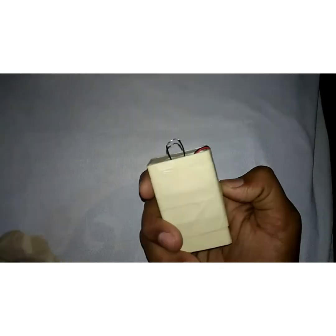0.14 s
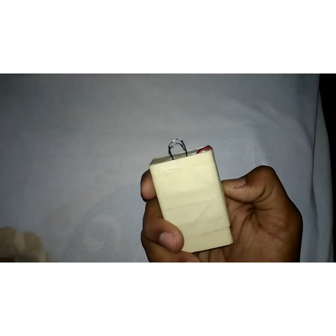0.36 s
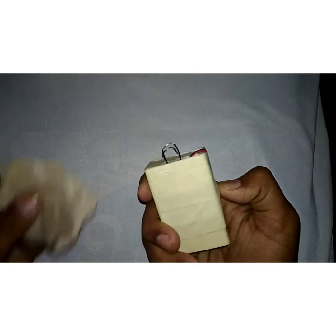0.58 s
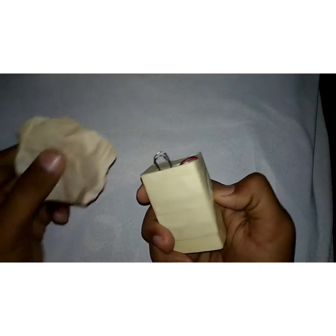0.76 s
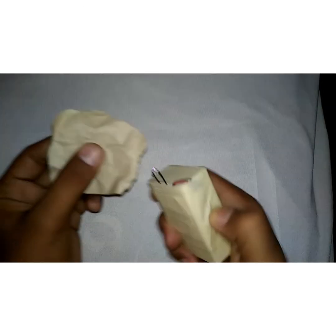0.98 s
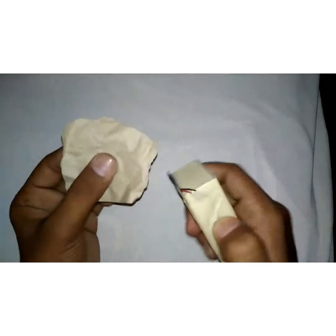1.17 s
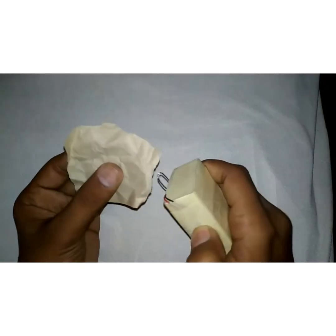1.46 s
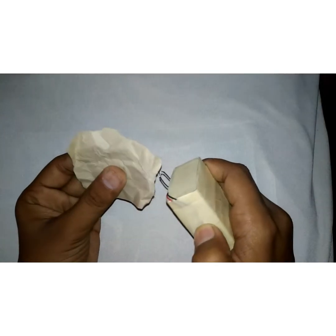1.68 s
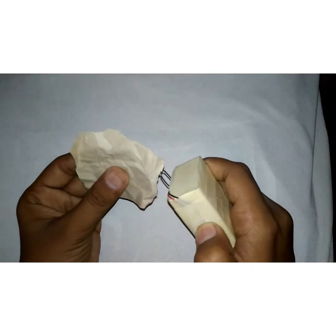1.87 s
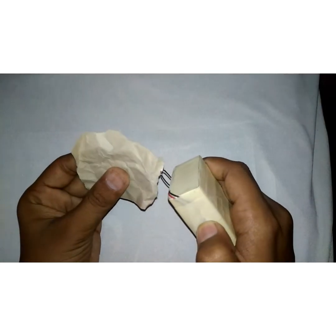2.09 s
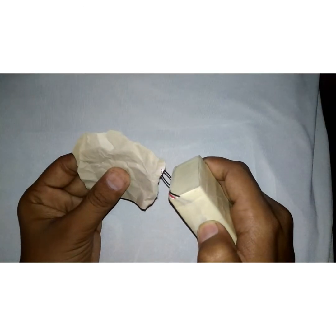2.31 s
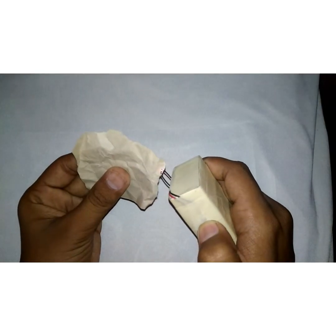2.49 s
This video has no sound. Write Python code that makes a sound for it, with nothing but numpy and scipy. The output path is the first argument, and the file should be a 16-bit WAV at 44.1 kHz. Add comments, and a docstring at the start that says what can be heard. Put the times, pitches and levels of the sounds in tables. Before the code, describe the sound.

An electric arc from a small hand-held device sizzles with a high hiss close to the microphone. It sputters against crumpled paper, squeals briefly and dies away, while fingers rustle faintly in a quiet room.

```python
"""A small hand-held high-voltage device arcs close to a camera while crumpled paper is brought to its electrodes.
Dense, irregular sparks make a high sizzle that sputters near the paper, narrows into brief squeals and dies away.
Fingers rustle faintly on the paper and the box, in a quiet room with a low hum."""
import sys
import numpy as np
from scipy import signal
from scipy.fft import rfft, irfft, next_fast_len
from scipy.io import wavfile
from scipy.ndimage import uniform_filter1d, map_coordinates

SR = 44100
rng = np.random.default_rng(int(sys.argv[2]) if len(sys.argv) > 2 else 0)


def materialize(psi):
    """Save the field psi as 16-bit PCM at rate SR to the path in sys.argv[1].

    A 1-D psi becomes a single channel; in a 2-D psi each row is a channel.
    """
    bounded = np.clip(np.atleast_2d(psi).T, -1, 1)
    quanta = np.round(bounded * 32767).astype(np.int16)
    wavfile.write(sys.argv[1], SR, quanta)


N = 116865

# the arc's main sizzle, 9-12 kHz (s, level dB, left-right dB)
SIZZLE = [(0.04, -68, 21), (0.1, -81, 15), (0.16, -81.0, 15), (0.17, -66.5, 18),
          (0.2, -62, -3), (0.219, -63.5, -18), (0.225, -49.5, -6), (0.24, -42, 3), (0.28, -48, 5), (0.31, -34.5, 0), (0.45, -37, 2),
          (0.6, -38, 4), (0.72, -40, 4.5), (1.065, -40, 4), (1.083, -36.5, 3), (1.13, -34.5, 9), (1.16, -45, 12),
          (1.183, -38, 10), (1.2, -46, 14), (1.25, -47, 5), (1.315, -52, -4),
          (1.382, -42, -17), (1.392, -63, -2), (1.41, -64, -22), (1.425, -43, -9),
          (1.467, -41.5, 5), (1.477, -40, -3), (1.52, -44.5, 3.5), (1.61, -37, 2.5), (1.735, -41, -1.5),
          (1.772, -48, 2), (1.788, -45, -6), (1.81, -45, -11), (1.823, -58, -16),
          (1.842, -57, -4), (1.85, -39, -12), (1.866, -42.5, 5), (1.877, -55, -12),
          (1.925, -41, 0), (2.01, -35.5, 1.5), (2.235, -56.5, -4), (2.263, -34.5, 4), (2.27, -48, 2),
          (2.286, -45, 4), (2.29, -34.5, -0.0), (2.298, -46.5, -1), (2.325, -45, 6), (2.345, -48, -11),
          (2.4, -40.5, 3.5), (2.48, -55.5, 4.5), (2.57, -68, 4), (2.65, -64, 1)]
# level of the lower sizzle, 7-9 kHz (s, dB)
LOWER = [(0.03, -69.5), (0.09, -89), (0.16, -92), (0.18, -63.5), (0.22, -70), (0.24, -40), (0.28, -42.5), (0.42, -44), (0.6, -45), (0.8, -43.5), (1.0, -48),
         (1.1, -48.5), (1.32, -69.5), (1.49, -49), (1.74, -50), (1.77, -65), (1.79, -50), (1.88, -66.5), (1.94, -50.5), (2.0, -46.5),
         (2.24, -60.5), (2.26, -46.5), (2.3, -54), (2.4, -47), (2.42, -58.5), (2.65, -81)]
# level of the fizz above 12 kHz (s, dB)
FIZZ = [(0.0, -94), (0.14, -102), (0.21, -78), (0.23, -56), (0.4, -57.5), (0.45, -60), (0.69, -52.5), (1.19, -54.5),
        (1.22, -61), (1.25, -57.5), (1.47, -55), (1.53, -52), (1.63, -61), (1.67, -51), (1.84, -60.5), (1.93, -52.5),
        (2.07, -47.5), (2.21, -73), (2.26, -62), (2.285, -71), (2.35, -57), (2.375, -59), (2.41, -52), (2.5, -73.5), (2.65, -76.5)]
# level of the dull edge of the hiss, 5-7 kHz (s, dB)
EDGE = [(0.0, -76.5), (0.12, -103), (0.22, -72.5), (0.235, -62), (0.45, -74), (0.85, -70), (0.95, -97), (1.03, -70.5), (1.35, -78),
        (1.52, -70.5), (1.9, -87), (1.95, -62), (2.21, -73), (2.27, -54), (2.35, -62), (2.39, -60.5), (2.65, -91)]
# colours (Hz, dB per Hz)
SIZZLE_COLOUR = [(8500, -44), (8900, -26), (9100, -1), (9450, -6), (9750, 2.5), (9950, -4.5), (10170, 1.5), (10480, -2), (10700, -3), (11000, -9), (11200, -7.5), (11480, -9), (11750, -28.5), (12200, -46.5), (13000, -64.5)]
LOWER_COLOUR = [(6400, -33.5), (7100, -19.5), (7500, -23), (7750, -3), (8000, -4), (8400, 0.5), (8720, -1), (8950, 1), (9400, -31.5)]
FIZZ_COLOUR = [(10500, -28.5), (11900, 0), (12400, -0.5), (13500, -6), (14500, -4), (15600, -9)]
EDGE_COLOUR = [(4000, -46), (5100, -12.5), (5600, -12), (6150, -3.5), (6900, -5), (7500, 4.5), (8500, -53.5)]
ROOM_COLOUR = [(15, -60), (35, -14.5), (114, 1), (164, -11.5), (344, -6.5), (524, -10.5), (627, -13), (1240, -13.5), (2300, -22.5), (3120, -25), (5280, -120)]
# squeals, where the arc locks onto one pitch (start s, length s, pitch Hz, glide Hz, level dB, left-right dB)
SQUEALS = [(0.239, 0.06, 7740, -21, -38, 1), (0.39, 0.079, 9220, -83, -37.5, -3), (0.392, 0.13, 10070, 14, -40, 2.5),
           (0.881, 0.18, 7826, -150, -46.5, -16), (1.068, 0.033, 9820, -400, -34.5, 5), (1.1, 0.0326, 9710, 240, -38, 11), (1.469, 0.028, 9280, 103, -37.5, 1),
           (1.613, 0.0385, 9300, -550, -39.5, -12), (1.848, 0.022, 9580, 43, -40.5, -3), (2.334, 0.052, 9060, 650, -38, 2), (2.377, 0.029, 7670, 2, -42, -1)]
SQUEAL_EDGE_S, SQUEAL_JITTER_HZ, SQUEAL_ROUGH_DB = 0.0072, 88.4, 7.5
FLUTTER_DB, FLUTTER_PER_S = 0.61, 110
SIZZLE_DB, LOWER_DB, FIZZ_DB, EDGE_DB = -1.5, -2, 1.5, 0.5
LOWER_PAN_DB, FIZZ_PAN_DB, EDGE_PAN_DB, SCRAPE_PAN_DB = -14, -1, -2, 9.5
SCATTER_T60_S = 0.06  # reflections from the hands and the cloth
ROOM_PAN = [(40, 3.5), (120, 5.5), (260, 8.5), (1200, 11.5), (2400, 14.5)]  # (Hz, left-right dB)
ROOM_ALIKE = [(40, 1), (120, 0.7), (300, 0.87), (700, 0.19), (1400, 0)]  # (Hz, left-right likeness)
HUM = [(100.5, -84), (124, -85), (200, -88)]  # (Hz, dB)
# soft bumps of the hands on the hollow box (middle s, length s, pitch Hz, level dB)
BUMPS = [(0.258, 0.02, 1265, -69.5), (0.294, 0.022, 358.7, -69), (0.326, 0.02, 620, -71.5), (1.044, 0.071, 352.4, -74), (1.175, 0.088, 124.6, -74.5),
         (1.567, 0.037, 316, -74), (1.631, 0.025, 53.7, -61.5), (1.597, 0.064, 139.7, -70.5), (1.927, 0.031, 111, -69.5), (2.181, 0.018, 614, -65.5)]
TOP_HZ = 15780  # fixed
T = np.arange(N) / SR
# fingers scraping on the box and the paper (start s, length s, centre Hz, level dB)
SCRAPES = [(0.224, 0.055, 3570, -60.5), (0.285, 0.15, 1800, -79), (0.297, 2.3, 3710, -88), (0.685, 0.038, 3060, -78), (0.748, 0.18, 1120, -77.5), (0.858, 0.065, 3460, -71.5),
           (1.098, 0.042, 4800, -69), (1.371, 0.034, 3450, -72.5), (1.422, 0.07, 3270, -78), (1.559, 0.088, 3340, -79), (1.892, 0.13, 3760, -80),
           (2.185, 0.13, 3210, -67.5), (2.36, 0.068, 3250, -71.5), (2.361, 0.13, 900, -74.5), (2.439, 0.053, 4340, -69)]
SCRAPE_WIDTH_OCT = 0.33
BUMP_PAN_DB = 10.5
SCATTER_HOLD_S = .09  # fixed
ROOM_DB = -71.5
MIC_HISS_DB = -83  # fixed
ARC_PATCHY_DB, ROOM_PATCHY_DB = 3, 3
# the arc sputters: brief spurts and gaps (middle s, length s, change dB)
SPUTTERS = [(0.402, 0.002, -3), (0.66, 0.0042, 4.5), (0.767, .003, 6), (0.783, 0.0022, 6.5), (0.952, 0.0014, 8), (1.183, 0.002, 9), (1.208, 0.0044, 0),
            (1.25, 0.0033, 8), (1.27, 0.004, 6.5), (1.326, 0.009, 6), (1.338, 0.0034, -9), (1.467, 0.0055, -9), (1.478, 0.0017, 4.5), (1.483, 0.0062, -3),
            (1.507, 0.0026, 3), (1.577, 0.0034, 5), (1.607, 0.0044, 1.5), (1.732, 0.0047, 4.5), (1.754, 0.01, 4.5), (1.833, 0.0063, 9), (1.859, 0.0029, -11),
            (2.15, .004, -1), (2.202, 0.0045, 6), (2.23, 0.01, -0.5), (2.265, 0.0041, 4.5), (2.293, 0.0026, 4), (2.323, 0.0046, -5.5), (2.365, 0.0035, -5)]
SCRAPE_ATTACK_S, SCRAPE_RELEASE_S = 0.026, 0.027
SPARK_SCATTER_DB, SPARK_GAP_SPREAD = 3, 0.6
# the sparks thin out near the paper (s, sparks a second)
SPARK_RATE = [(1.0, 3000), (1.3, 1700)]
# a thin, wavering whine under the freely burning arc
WHINE_START_S, WHINE_LENGTH_S, WHINE_HZ, WHINE_WAVER_HZ, WHINE_DB, WHINE_PAN_DB = 0.3, 0.73, 6020, 54.6, -88, -6


def amp(db):
    """Decibels to gain."""
    return 10 ** (np.asarray(db) / 20)


def unit(x):
    """Scale to rms 1."""
    return x / np.sqrt(np.mean(x ** 2) + 1e-20)


def along(points, hz):
    """(Hz, value) points on a log axis."""
    f, v = np.transpose(points)
    return np.interp(np.log(hz + 1), np.log(f + 1), v)


def curves(rows):
    """One value per sample for each column after the time."""
    s, *cols = np.transpose(rows)
    return [np.interp(T, s, c) for c in cols]


def wobble(rate):
    """A smooth random curve, rate knots a second."""
    return map_coordinates(rng.standard_normal(int(N * rate / SR) + 4), [T * rate])


def filtered(x, response):
    """x times a response of frequency."""
    m = next_fast_len(N + SR // 2)
    return irfft(rfft(x, m) * response(np.fft.rfftfreq(m, 1 / SR)), m)[..., :N]


def coloured(x, points):
    """Causal filter with the given spectrum, closed beyond its ends."""
    m = 2 * next_fast_len(N)
    hz = np.fft.rfftfreq(m, 1 / SR)
    octaves_out = np.abs(np.log2((hz + 1) / np.clip(hz + 1, points[0][0], points[-1][0])))
    db = np.maximum(along(points, hz) - 120 * octaves_out, -100)  # fixed
    cep = irfft(np.log(amp(db)))
    cep[1:m // 2] *= 2
    cep[m // 2 + 1:] = 0
    return irfft(rfft(x, m) * np.exp(rfft(cep)))[..., :N]


def panned(db):
    """Left and right gains with a mean of 1."""
    g = amp(np.array([np.atleast_1d(db), -np.atleast_1d(db)]) / 2)
    return g / g.mean(axis=0)


def clicks(rate, scatter_db):
    """Irregular clicks of uneven size."""
    return (rng.random(N) < rate / SR) * amp(scatter_db * np.clip(rng.standard_normal(N), -2, 1.3))  # fixed


def scattered(x, wet_db):
    """The direct sound plus short reflections that differ at each microphone and shift as the hands move."""
    t = T[:SR // 16]
    wet = np.zeros((2, N + len(t)))
    for s in np.arange(0, T[-1], SCATTER_HOLD_S):
        near = np.flatnonzero(np.abs(T - s) < SCATTER_HOLD_S)
        piece = x[near] * np.cos(np.pi / 2 * (T[near] - s) / SCATTER_HOLD_S)
        tail = rng.standard_normal((2, len(t))) * amp(-60 * t / SCATTER_T60_S)
        echo = signal.fftconvolve(piece[None], tail / np.linalg.norm(tail, axis=1, keepdims=True), axes=1)
        wet[:, near[0]:near[0] + echo.shape[1]] += echo
    return x + amp(wet_db) * wet[:, :N]


def band(x, colour, wet_db):
    """A stereo band of the clicks x, its middle at rms 1."""
    pair = patchy(scattered(coloured(x, colour), wet_db), ARC_PATCHY_DB)
    return pair / np.std(pair.mean(axis=0))


def arc():
    """One fluttering stream of sparks drives every band of the sizzle."""
    sparks = spark_train() * amp(FLUTTER_DB * wobble(FLUTTER_PER_S))
    level_db, pan_db = curves(SIZZLE)
    main = amp(level_db + SIZZLE_DB) * panned(pan_db) * band(sparks, SIZZLE_COLOUR, wet_db=-9.5)
    lower = amp(curves(LOWER)[0] + LOWER_DB) * panned(LOWER_PAN_DB) * band(sparks, LOWER_COLOUR, wet_db=7.5)
    fizz = amp(curves(FIZZ)[0] + FIZZ_DB) * panned(FIZZ_PAN_DB) * band(sparks, FIZZ_COLOUR, wet_db=0.5)
    edge = amp(curves(EDGE)[0] + EDGE_DB) * panned(EDGE_PAN_DB) * band(sparks, EDGE_COLOUR, wet_db=12)
    return main + lower + fizz + edge


def squeals():
    """Short, rough, gliding whistles inside the sizzle."""
    out = np.zeros((2, N))
    jitter = SQUEAL_JITTER_HZ * wobble(900)
    rough = unit(amp(SQUEAL_ROUGH_DB * np.minimum(wobble(700), .5)))
    for start, length, hz, glide, db, pan_db in SQUEALS:
        t = T - start
        gate = np.clip(np.minimum(t, length - t) / SQUEAL_EDGE_S, 0, 1)
        phase = 2 * np.pi * np.cumsum(hz + glide * np.clip(t / length, 0, 1) + jitter) / SR
        out += amp(db) * panned(pan_db) * (gate * rough * np.sqrt(2) * np.sin(phase))
    return out


def handling():
    """Fingers scrape over paper and box in grainy strokes, and bump the box softly."""
    out = np.zeros((2, N))
    grains = scattered(clicks(rate=2900, scatter_db=0.5), wet_db=0.5)
    for s, length, centre_hz, db in SCRAPES:
        rub = unit(filtered(grains, lambda hz: 1 / (1 + (np.log2((hz + 1) / centre_hz) / SCRAPE_WIDTH_OCT) ** 2)))
        out += amp(db) * stroke(s, length) * panned(SCRAPE_PAN_DB) * rub
    waver_hz = 26 * wobble(80)
    for s, length, hz, db in BUMPS:
        phase = 2 * np.pi * np.cumsum(hz + waver_hz) / SR
        out += amp(db) * swell(s, length) * panned(BUMP_PAN_DB) * np.sqrt(2) * np.sin(phase)
    return out


def room():
    """Low room noise, a slightly unsteady hum and faint microphone hiss."""
    turn = lambda hz: np.arccos(np.clip(along(ROOM_ALIKE, hz), -1, 1)) / 2
    mid, side = filtered(rng.standard_normal((2, N)), lambda hz: amp(along(ROOM_COLOUR, hz)) * [np.cos(turn(hz)), np.sin(turn(hz))])
    air = unit(filtered(np.array([mid + side, mid - side]), lambda hz: panned(along(ROOM_PAN, hz))))
    hum = sum(amp(db + 6.5 * wobble(16)) * np.sqrt(2) * np.sin(2 * np.pi * hz * T + .7 * wobble(18)) for hz, db in HUM)
    return amp(ROOM_DB) * unit(patchy(air, ROOM_PATCHY_DB)) + hum + amp(MIC_HISS_DB) * rng.standard_normal((2, N))


def swell(middle, length):
    """A bell-shaped rise and fall."""
    return np.exp(-2 * ((T - middle) / length) ** 2)


def patchy(x, depth_db):
    """The colour flickers: patches of random gain, some 250 Hz by 30 ms."""
    z = signal.stft(x, nperseg=512)[2]
    field = uniform_filter1d(uniform_filter1d(rng.standard_normal(z.shape[1:]), size=3, axis=0), size=5, axis=1)
    return signal.istft(z * amp(depth_db * unit(field)), nperseg=512)[1][:, :N]


def stroke(start, length):
    """A quick rise, a hold and a short fade."""
    t = T - start
    return np.clip(t / SCRAPE_ATTACK_S, 0, 1) * np.exp(-np.maximum(t - length, 0) / SCRAPE_RELEASE_S)


def spark_train():
    """The gap recharges and breaks down again after an uneven wait; the mean power stays even."""
    rate, = curves(SPARK_RATE)
    wait, size = rng.standard_normal((N // 4, 2)).T
    waits = np.exp(SPARK_GAP_SPREAD * wait)
    at = np.searchsorted(np.cumsum(rate) / SR, np.cumsum(waits) / waits.mean())
    return np.bincount(at, amp(SPARK_SCATTER_DB * np.minimum(size, 1)), N + 1)[:N] / np.sqrt(rate)


def whine():
    """A faint, unsteady line below the sizzle."""
    hz = WHINE_HZ + WHINE_WAVER_HZ * (wobble(9.4) + wobble(500))
    level = amp(WHINE_DB) * stroke(WHINE_START_S, WHINE_LENGTH_S)
    return level * panned(WHINE_PAN_DB) * np.sqrt(2) * np.sin(2 * np.pi * np.cumsum(hz) / SR)


def scene():
    """The sputtering arc, the hands and the room."""
    sputter = amp(sum(db * swell(s, length) for s, length, db in SPUTTERS))
    return sputter * (arc() + squeals() + whine()) + handling() + room()


def record(dry):
    """The camera keeps nothing above its band limit."""
    return filtered(dry, lambda hz: hz < TOP_HZ)


dry = scene()
out = record(dry)
materialize(out)
```